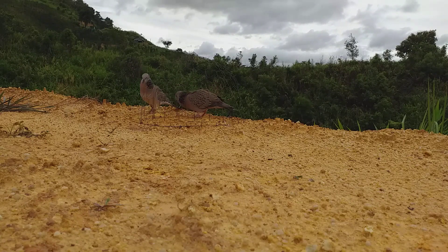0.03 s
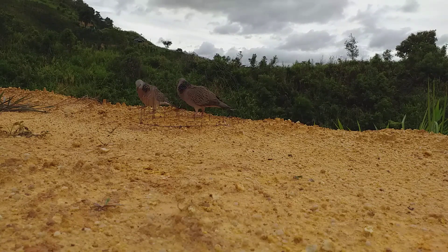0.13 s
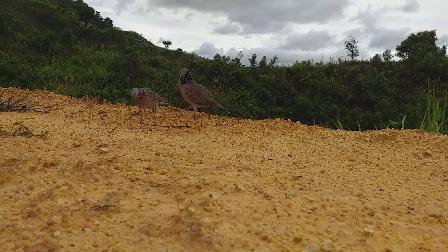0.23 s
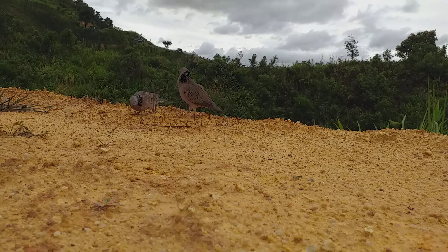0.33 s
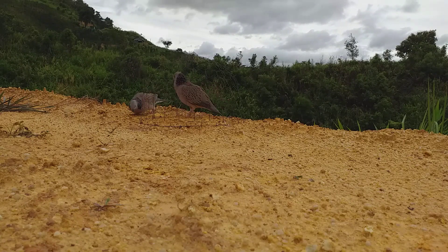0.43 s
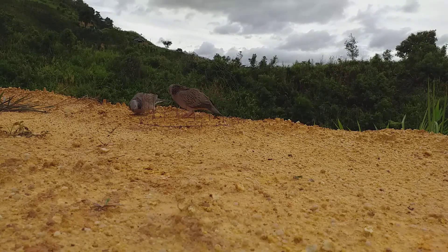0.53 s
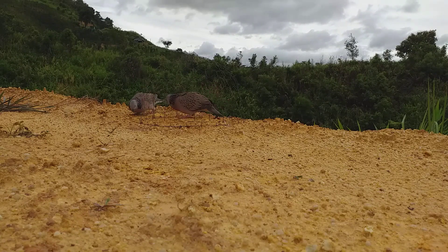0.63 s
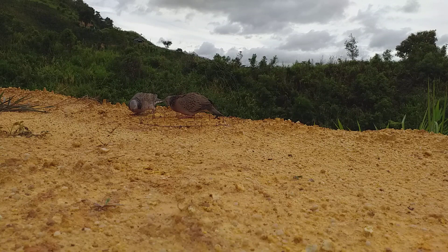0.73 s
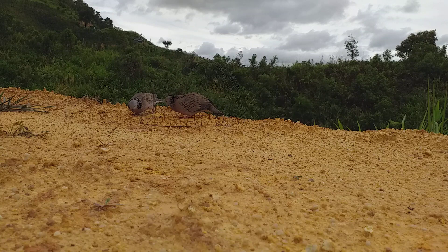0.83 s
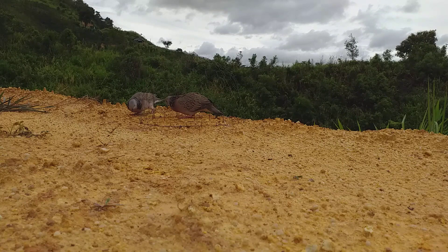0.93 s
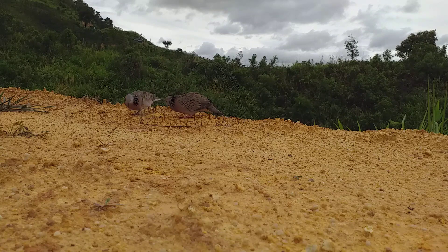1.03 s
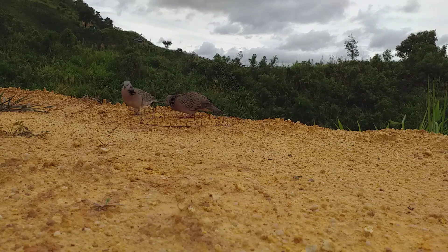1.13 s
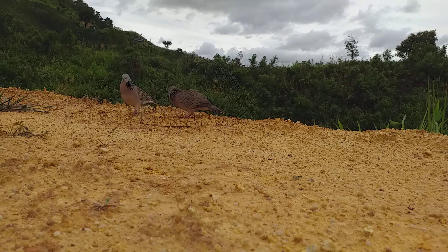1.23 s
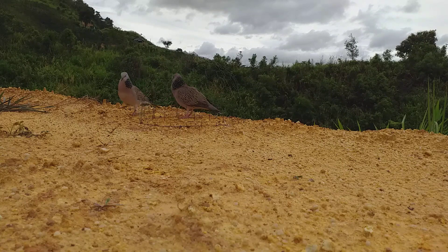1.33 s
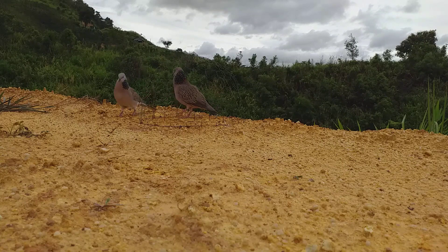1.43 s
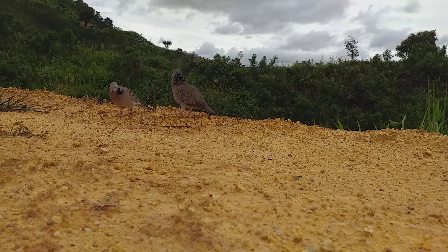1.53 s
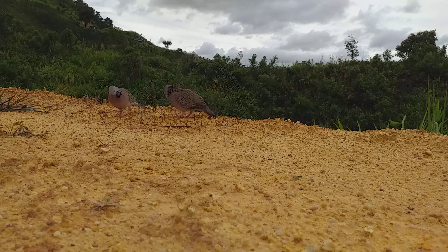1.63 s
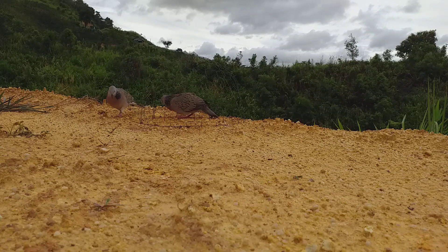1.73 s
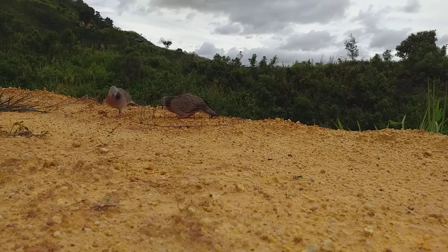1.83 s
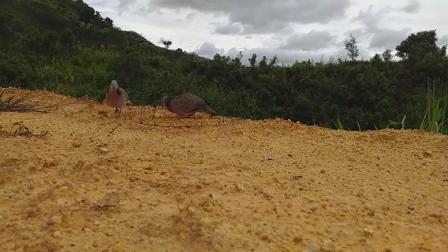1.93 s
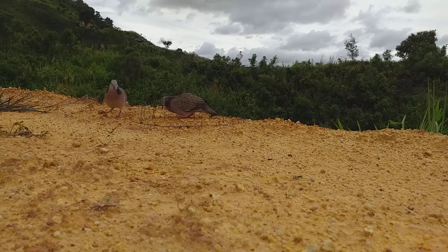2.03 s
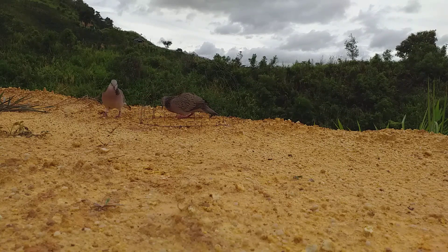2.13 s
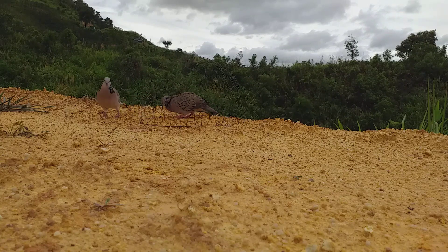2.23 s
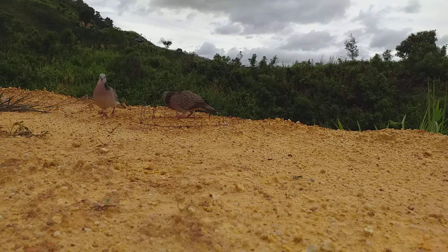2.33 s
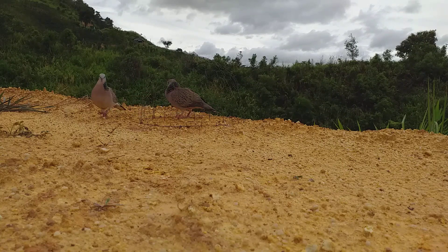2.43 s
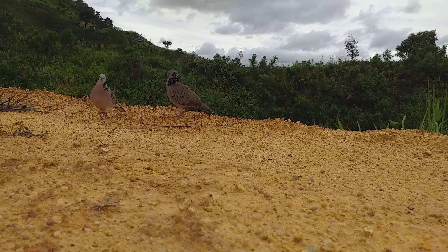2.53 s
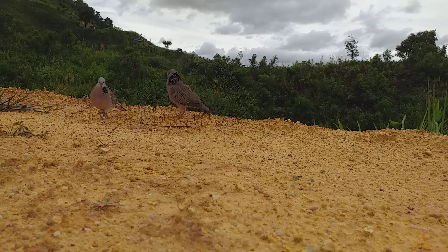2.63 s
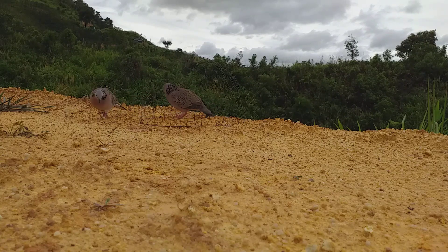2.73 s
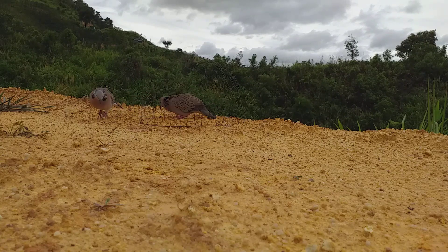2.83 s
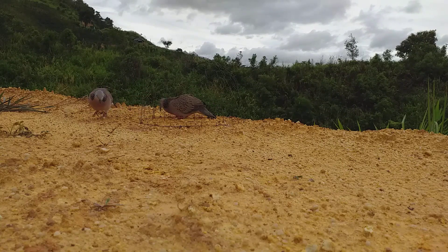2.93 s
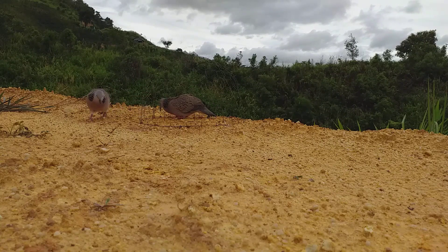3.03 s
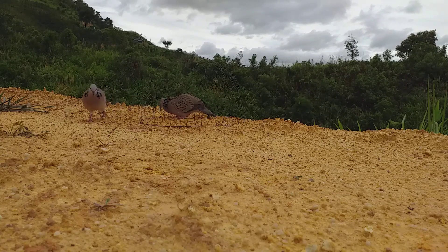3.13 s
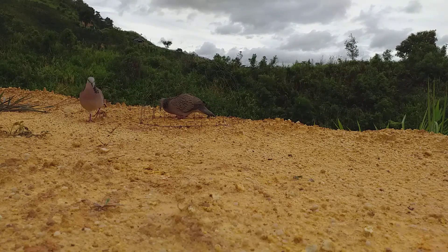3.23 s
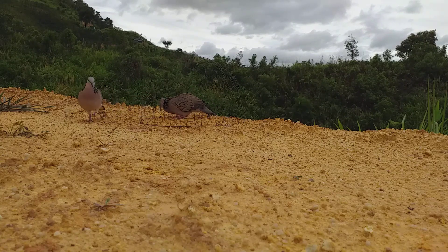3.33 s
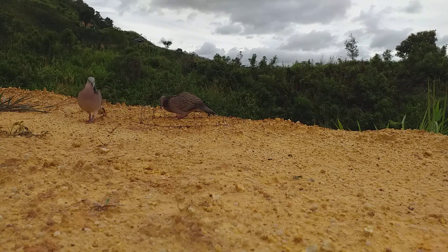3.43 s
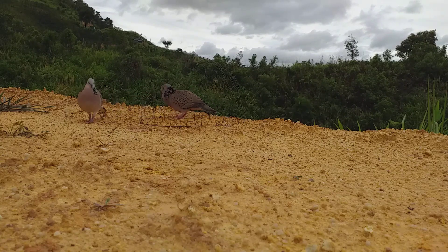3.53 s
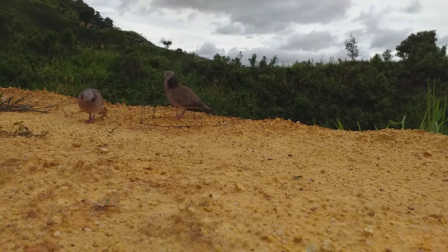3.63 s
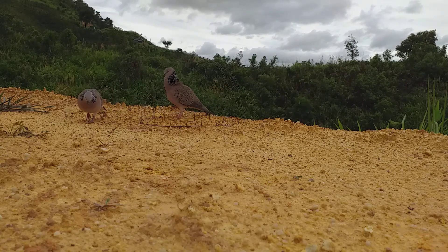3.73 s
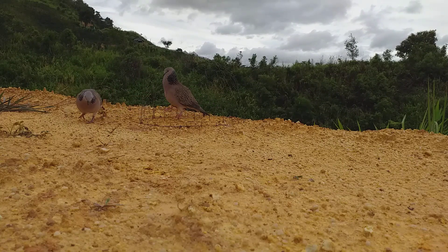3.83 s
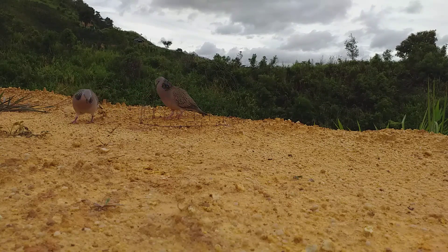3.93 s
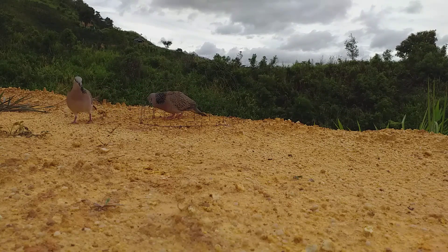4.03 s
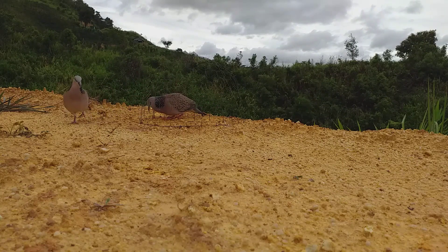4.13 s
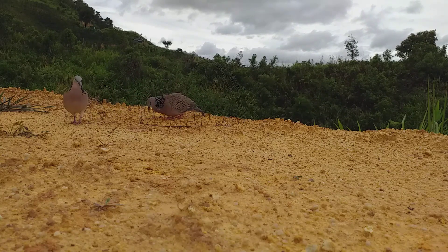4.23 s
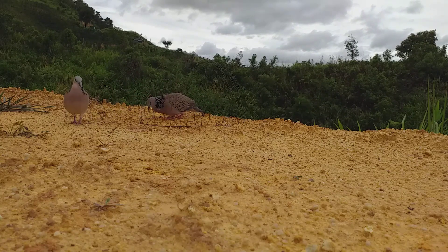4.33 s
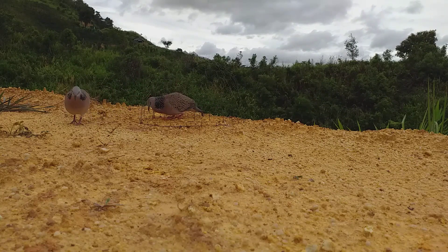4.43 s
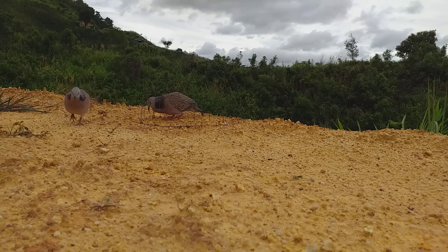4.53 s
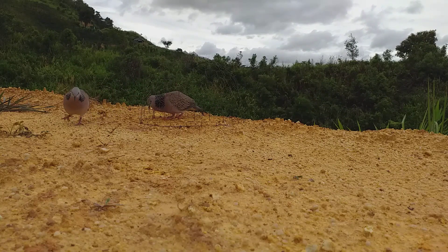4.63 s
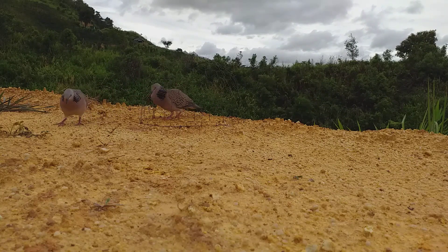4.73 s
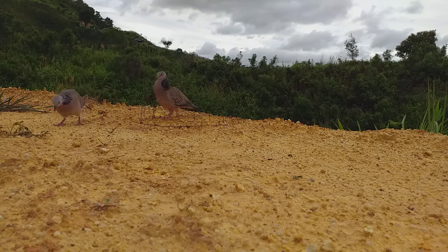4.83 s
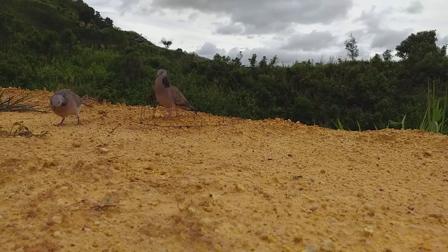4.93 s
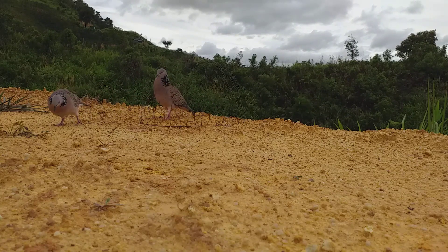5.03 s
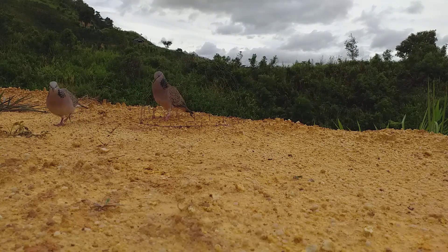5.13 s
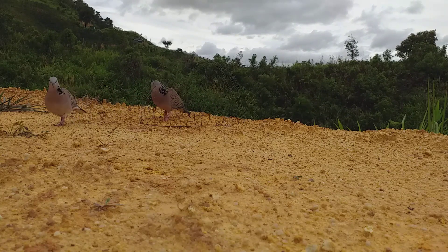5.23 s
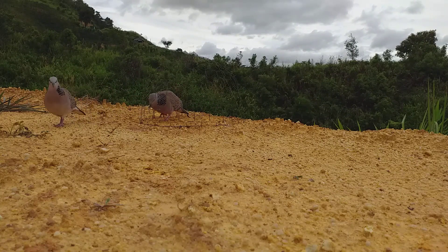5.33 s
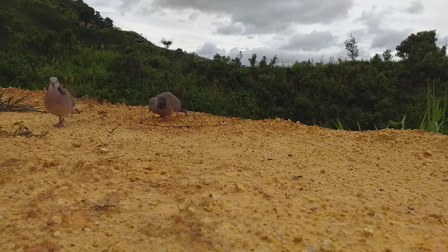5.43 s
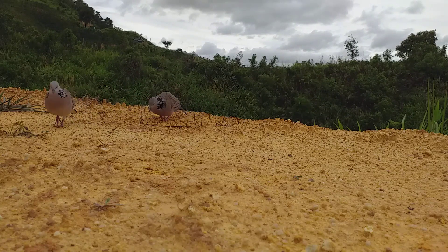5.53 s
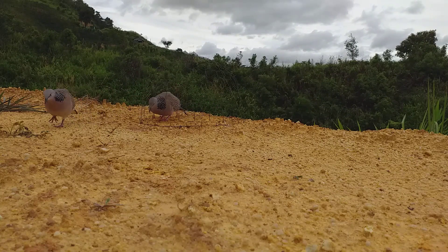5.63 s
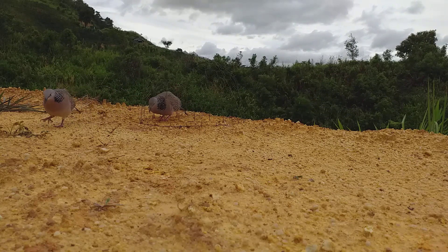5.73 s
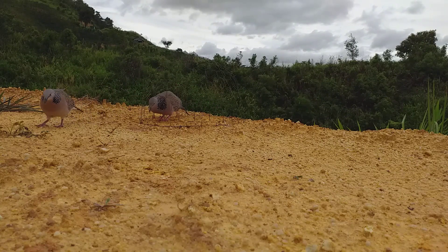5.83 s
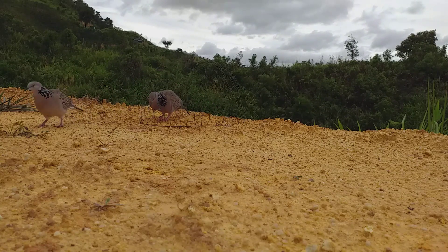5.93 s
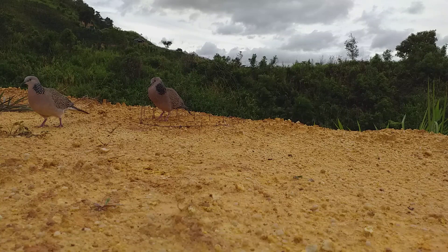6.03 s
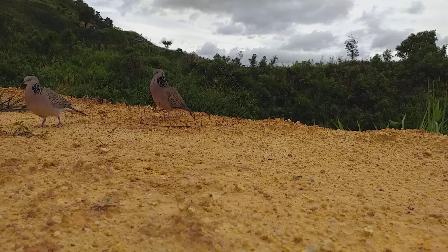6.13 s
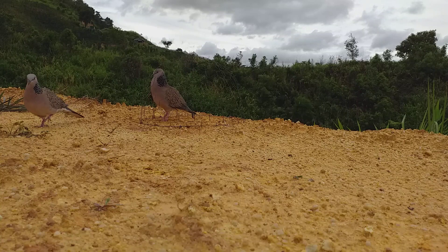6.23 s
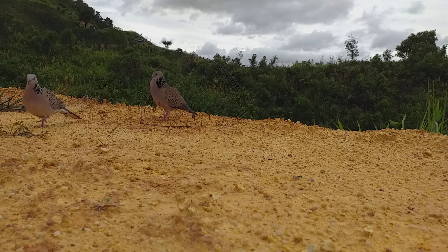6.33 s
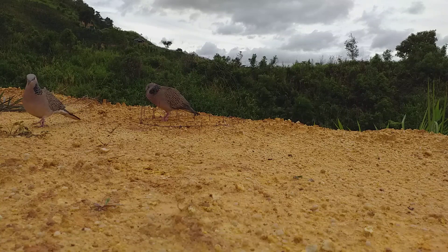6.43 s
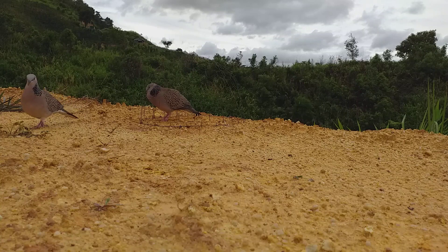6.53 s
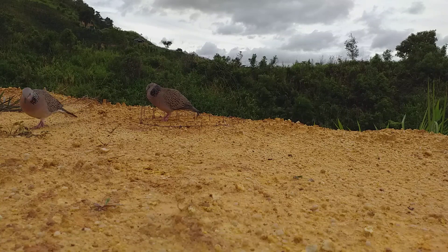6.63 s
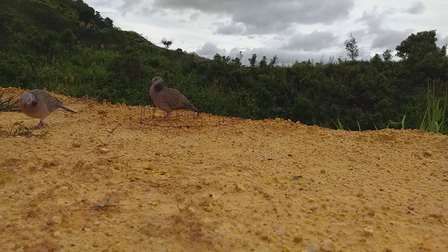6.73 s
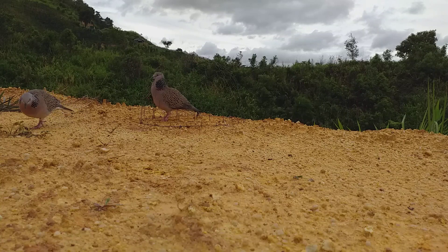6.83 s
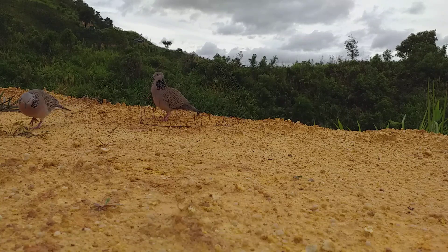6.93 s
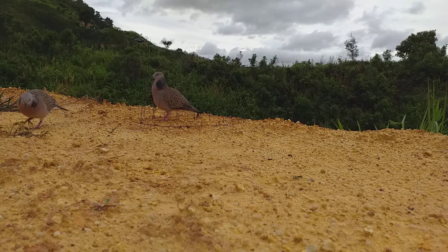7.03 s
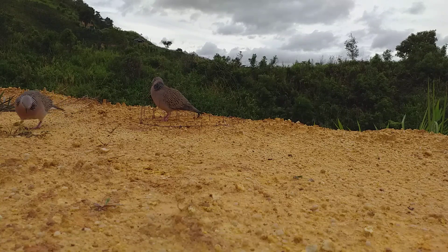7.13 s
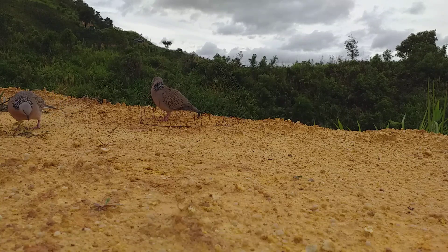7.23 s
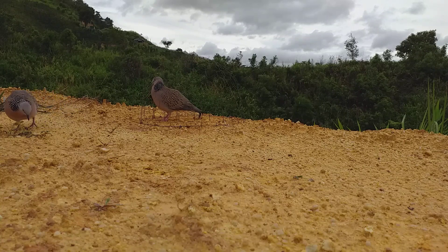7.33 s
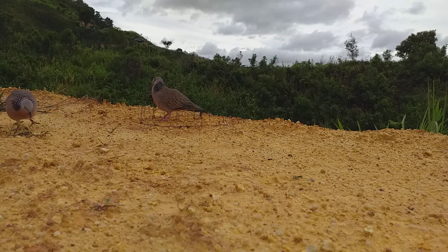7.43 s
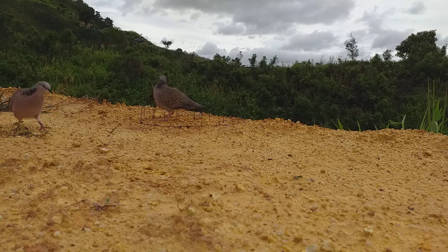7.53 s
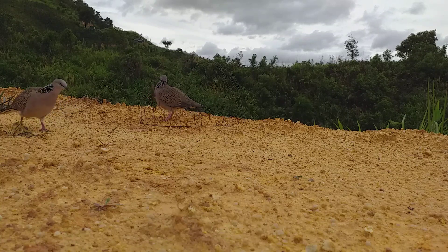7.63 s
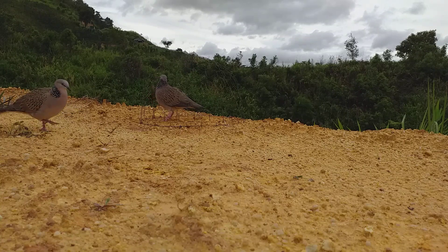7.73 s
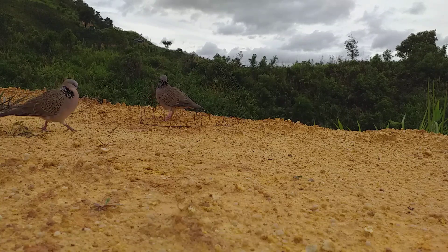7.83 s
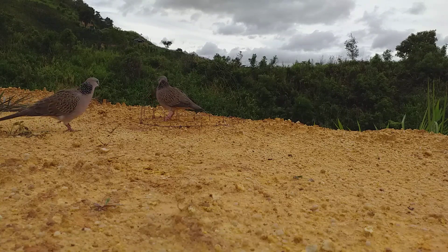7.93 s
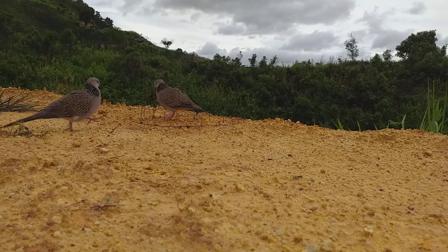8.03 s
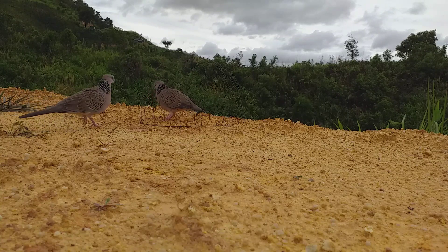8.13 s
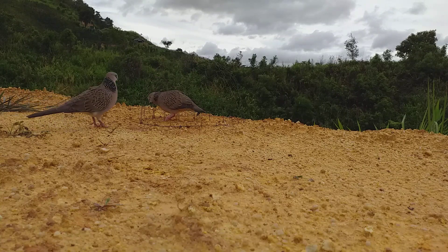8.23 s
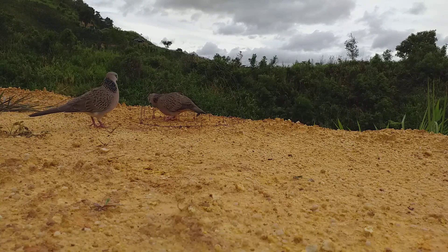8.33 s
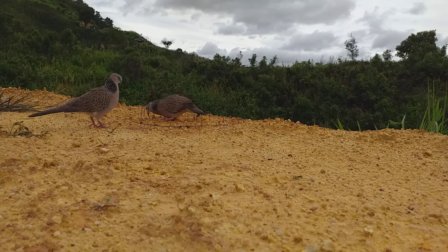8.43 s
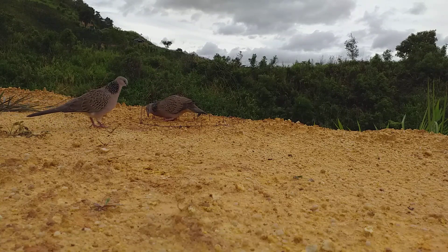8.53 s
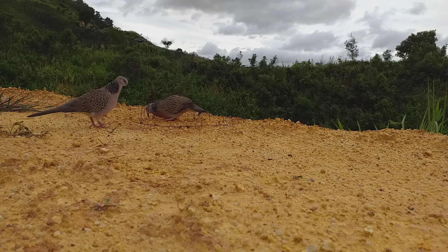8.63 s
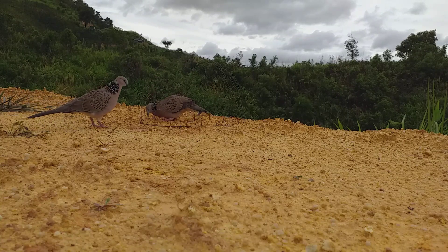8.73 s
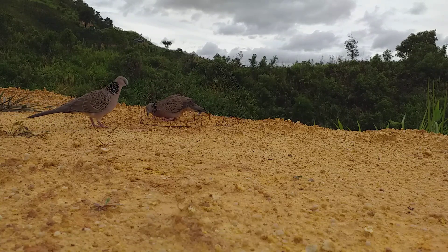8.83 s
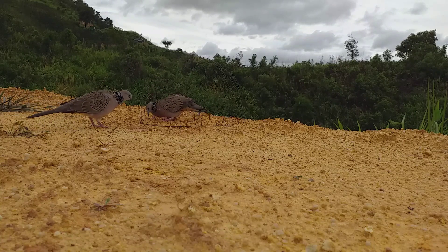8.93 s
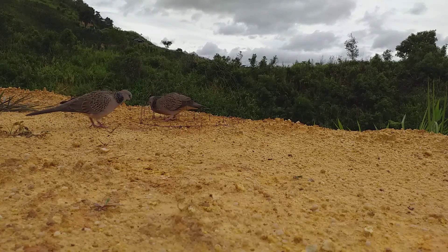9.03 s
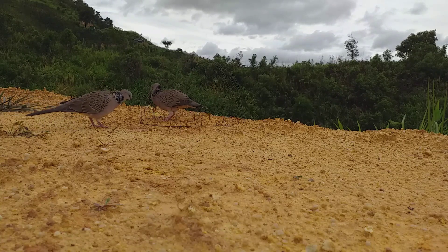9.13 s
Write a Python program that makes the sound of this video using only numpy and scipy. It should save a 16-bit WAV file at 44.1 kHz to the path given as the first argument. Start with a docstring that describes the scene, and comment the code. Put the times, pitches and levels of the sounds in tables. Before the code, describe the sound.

Close, dry dove coos dominate: a brief purring note, then a longer one that flutters, clears to a smooth hoot and sinks away. A higher dove overlaps once near the start. Pairs repeat just over a second apart, stop after six seconds, and return near the end. Very faint crickets, small-bird pips and low air rumble sit behind in open scrub.

```python
"""Spotted doves: paired coos, a short fluttering note and a long one that clears and falls away; a higher voice joins once.
Each coo is a nearly pure tone chopped by a closing valve, shaped by the throat, with overtones and breath added.
Around them: faint far calls (short grainy noise bands), far songbirds (gliding whistles), crickets (paired wing
strokes), a steady air rumble and insect blur (coloured noise), and a faint diffuse echo from the scrub."""
import sys
import numpy as np
from scipy import signal
from scipy.fft import rfft, irfft, next_fast_len
from scipy.io import wavfile
from scipy.ndimage import uniform_filter1d, map_coordinates

SR = 44100
rng = np.random.default_rng(int(sys.argv[2]) if len(sys.argv) > 2 else 0)


def bounce(signal):
    """Save signal as a 16-bit WAV file at the path given by the first command-line argument."""
    frames = np.transpose(np.atleast_2d(signal))
    limited = np.clip(frames, -1, 1)
    pcm = np.round(limited * 32767).astype(np.int16)
    wavfile.write(sys.argv[1], SR, pcm)


N = 404397

# Short coos: (start [s], length [s], drive level [dB], swell [dB/s], mid pitch [Hz], glide [Hz/s],
# flutter [pulses/s], air hiss [dB re drive], throat tuning [1 = lower dove])
SHORT_COOS = [ (0.359, 0.2004, -28, 15.5, 643.9, 198.5, 96, -51, 1.263),
              (0.625, .194, -23.5, 9.5, 600.2, 100.5, 104, -57, 1.003),
              (1.711, 0.1799, -24, 1.5, 594.1, -100, 96, -53.5, 1.0045),
              (2.839, 0.1811, -25, -8.5, 591.6, -100, 106, -49.5, 0.999),
              (4.058, .192, -24.5, 0.5, 576.6, -150, 98, -54, 1),
              (5.329, 0.19, -23.5, -12, 578.9, -200, 98, -47.5, 1),
              (8.437, 0.2198, -28, -35.5, 549.5, -400, 94, -52.5, 1.054)]
# Long coos: (start [s], held drive level [dB], swell [dB/s], held pitch [Hz], mid-flutter rate [pulses/s],
# flutter clears after [s], air hiss [dB re drive], third harmonic [dB])
LONG_COOS = [ (-.205, -19.5, 4.5, 603.1, 70, .28, -50, -31), (.926, -22, -3.5, 601.1, 88, .29, -47, -31),
             (2.004, -21.5, 4, 602.4, 86, .275, -49, -32), (3.136, -21.5, 8.5, 599.5, 82, .27, -49, -32),
             (4.358, -21.5, 3, 584.4, 78, .255, -42.5, -35.5),
             (5.618, -21.5, -9, 590.5, 58, .25, -42.5, -43.5),
             (8.776, -21.5, 10, 607.3, 62, .266, -45.5, -30.5)]
# Higher dove's long note: (time [s], drive level [dB], pitch [Hz])
HIGH_NOTE = [(.65, -46, 639.5), (.698, -29.5, 680), (.778, -30, 700), (.85, -28, 740), (.94, -28.5, 755),
             (.99, -27, 727.8), (1.035, -34, 649.2), (1.06, -56.5, 595)]
# Its flutter: (clears at [s], start, middle, end rate [pulses/s], unevenness [0-1], limp [share of a pulse],
# depth [1 = full closure], air hiss [dB re drive], throat tuning [1 = lower dove])
HIGH_FLUTTER = (0.8543, 94, 80, 42, 0.1118, 0, 1.11, -42.5, 1.4556)
# Swollen-throat response at tuning 1: (frequency [Hz], gain [dB])
THROAT = [(100, -32.5), (250, -5.5), (350, -4.5), (450, -1.5), (560, 5.5), (680, 5), (800, 5), (950, -3.5),
          (1200, -31), (1700, -38), (3000, -67.5)]
# Closed-beak response above the tone, at tuning 1: (frequency [Hz], gain [dB])
OVERTONES = [(300, -23.5), (650, -7.5), (900, 7), (1100, -0.5), (1230, -16), (1400, -21), (1600, -14),
             (1900, -14), (2100, -23.5), (3000, -44)]
# Membrane turbulence spectrum: (frequency [Hz], relative density [dB/Hz])
RASP = [(200, -10.5), (600, 2), (1100, -3), (1900, -5), (3000, -16)]
# Breath spectrum: (frequency [Hz], relative density [dB/Hz])
AIR_HISS = [(50, -8.5), (130, 11), (280, 12.5), (600, -5), (1200, -5), (1700, -9.5), (2400, -6), (3500, 0),
            (4800, 0), (6200, -5), (7400, -12.5), (8500, -24), (15000, -17.5)]
# Air whistling in the higher dove's beak: (time [s], level [dB], pitch [Hz])
BEAK_WHISTLE = [(.4, -100, 7500), (.52, -74, 7500), (.58, -93.5, 7500), (.68, -85.5, 7700),
                (.75, -72, 7350), (0.849, -68, 7220), (0.931, -71, 6930), (1.02, -82.5, 6230),
                (1.079, -105, 6240)]
# Faint distant calls, hazy and noisy: (centre time [s], half length [s], centre frequency [Hz],
# level before window [dB])
FAR_CALLS = [(1.59, .05, 1700, -78), (2.58, .05, 1800, -79), (2.7, .07, 4000, -68), (6.9, .08, 1750, -77),
             (7.88, .08, 1850, -75.5), (8.08, .07, 1800, -75.5)]
# Small bird's runs of falling pips: (first pip centre [s], level [dB])
PIP_RUNS = [(-.015, -58.5), (0.384, -59.5), (0.781, -58), (1.231, -59)]
# Far songbird notes: (start [s], length [s], start, middle, end pitch [Hz], level [dB])
TWEETS = [(2.94, 0.064, 2984, 3230, 3080, -66), (2.982, 0.0582, 3385, 3130, 3090, -62.5),
          (3.587, 0.0436, 4300, 4000, 3690, -70.5), (3.675, 0.037, 3050, 3300, 3690, -71),
          (3.742, 0.0454, 3940, 3700, 3480, -72.5), (3.855, 0.0586, 3262, 3550, 3080, -70),
          (3.92, 0.044, 4150, 4250, 3500, -67), (3.99, 0.059, 3480, 3700, 2980, -68.5),
          (4.028, .034, 3190, 3550, 4000, -65), (4.09, .03, 4100, 3750, 3346, -69)]
# Crickets: (first chirp [s], period [s], mid pitch [Hz], relative level [dB])
CRICKETS = [(.131, .2953, 5570, -64.5), (.21, .3018, 5500, -65.5), (.137, .2875, 5870, -69.5),
            (.207, .312, 5780, -72), (.148, .288, 6090, -80)]
# Outdoor air spectrum: (frequency [Hz], relative density [dB/Hz])
AIR = [(20, -32), (35, -21), (52, -6), (80, -2), (100, 0), (190, -5), (300, -13), (450, -16), (700, -21),
       (1500, -27), (3300, -27), (5000, -28), (7500, -31.5), (8600, -35), (15700, -30)]
# Far insect blur: (frequency [Hz], relative density [dB/Hz])
CHORUS = [(3000, -31.0), (4400, -18.5), (5000, -9.5), (5300, -15.0), (5500, -1), (5900, -6.5),
          (6250, -23.0), (7500, -20.5), (8300, -48)]
# Scrub echo decay: (frequency [Hz], t60 [s])
SCRUB = [(300, .3), (700, .28), (3000, .33), (6000, .3), (12000, .15)]

# coo contours
ONSET_DB, SHORT_ATTACK_S, LONG_ATTACK_S = 27.5, .0105, .014
SCOOP_SHARE, SCOOP_S = 0.19, .022  # slide up to pitch
RELEASE_DB, RELEASE_S = 24, .014  # end of a short coo
DROOP_SHARE, DROOP_S = .17, .028  # its final pitch droop
LONG_COO_S, HOLD_S = .403, 0.24815
ROUNDING_S = .017  # bend from hold into fall
SINK_HZ_PER_S, FALL_DB_PER_S = 1080, 111
EDGE_S = .012  # fade at both ends of a note
# flutter
FIRST_PULSES_PER_S, LAST_PULSES_PER_S = 96, 43  # long coo
SHORT_UNEVEN, LONG_UNEVEN = .07, .22  # 0-1
LIMP = .06  # long coo: every second pulse shorter and weaker [share of a pulse]
DEPTH = .96  # lower dove's valve closure, 1 = full
SLIP_RAD = 1.3  # phase scatter from pulse to pulse
BEND = .6  # pitch swing within a pulse, per unit of unevenness
# voice
JITTER, SHIMMER = .016, .08  # quick unsteadiness of pitch, loudness [shares]
WIDEST_SWING = .15  # soft limit of membrane amplitude
SHORT_THIRD_DB = -39
HIGH_SECOND_DB, HIGH_THIRD_DB = -31, -40
DULL_START_DB, BRIGHTEN_S = 8.5, 0.016  # overtones lag the tone
HOARSENING = 0.58  # breath gained per effort lost [dB/dB]
# surroundings
CRICKET_STROKE_S, CRICKET_RASP_RAD = .056, .55
AIR_DB = -66.6
FADE_IN_S, TOP_HZ = .004, 15750


def amp(db):
    """Decibels to gain."""
    return 10 ** (np.asarray(db) / 20)


def unit(x):
    """Scale to rms 1."""
    return x / np.sqrt(np.mean(x ** 2) + 1e-20)


def along(points, hz):
    """Read (Hz, value) points on a log-frequency axis."""
    f, v = np.transpose(points)
    return np.interp(np.log(hz + 1), np.log(f + 1), v)


def filtered(x, response):
    """Multiply the spectrum of x by response(hz)."""
    m = next_fast_len(len(x) + 8192)
    return irfft(rfft(x, m) * response(np.fft.rfftfreq(m, 1 / SR)), m)[:len(x)]


def noise(spectrum, size):
    """Coloured noise of rms 1."""
    white = rng.standard_normal(size)
    return unit(filtered(white, lambda hz: amp(along(spectrum, hz))))


def wobble(knots_per_s, size):
    """Smooth random curve through normal knots."""
    knots = rng.standard_normal(int(size * knots_per_s / SR) + 4)
    return map_coordinates(knots, [np.arange(size) * knots_per_s / SR])


def turn(hz):
    """Running phase [rad] of a frequency curve."""
    return 2 * np.pi * np.cumsum(hz) / SR


def add(track, start_s, sound):
    """Mix a sound into the track, clipped to its ends."""
    at = round(start_s * SR) + np.arange(len(sound))
    inside = (at >= 0) & (at < N)
    track[at[inside]] += sound[inside]


def doves():
    """All coos, plus the higher dove's long note."""
    out = np.zeros(N)
    for row in SHORT_COOS:
        add(out, row[0], short_coo(*row))
    for row in LONG_COOS:
        add(out, row[0], long_coo(*row))
    add(out, HIGH_NOTE[0][0], coo(HIGH_NOTE, HIGH_FLUTTER, HIGH_THIRD_DB, HIGH_SECOND_DB))
    return out


def short_coo(start_s, length_s, db, swell, hz, glide, rate, hiss_db, tuning):
    """An arch of level and pitch that flutters at a steady mean rate to its end."""
    u = np.linspace(0, length_s, num=200)
    from_middle = u - length_s / 2
    level_db, pitch_hz = onset(u, SHORT_ATTACK_S, db + swell * from_middle, hz + glide * from_middle)
    level_db = level_db - RELEASE_DB * np.exp((u - length_s) / RELEASE_S)
    pitch_hz = pitch_hz * (1 - DROOP_SHARE * np.exp((u - length_s) / DROOP_S))
    flutter = (start_s + length_s, rate, rate, SHORT_UNEVEN, 0, DEPTH, hiss_db, tuning)
    return coo(np.column_stack([start_s + u, level_db, pitch_hz]), flutter, SHORT_THIRD_DB)


def long_coo(start_s, db, swell, hz, rate, clears_s, hiss_db, third_db):
    """Holds while the flutter slows; as air runs out, level and pitch sink together in a clear tone."""
    u = np.linspace(0, LONG_COO_S, num=400)
    # seconds into the fall, with a rounded corner
    spent_s = ROUNDING_S * np.logaddexp(0, (u - HOLD_S) / ROUNDING_S)
    held_db = db + swell * np.minimum(u - HOLD_S, 0)
    falling_db = held_db - FALL_DB_PER_S * spent_s
    sinking_hz = hz - SINK_HZ_PER_S * spent_s
    level_db, pitch_hz = onset(u, LONG_ATTACK_S, falling_db, sinking_hz)
    rates = (FIRST_PULSES_PER_S, rate, LAST_PULSES_PER_S)
    flutter = (start_s + clears_s, *rates, LONG_UNEVEN, LIMP, DEPTH, hiss_db, 1)
    return coo(np.column_stack([start_s + u, level_db, pitch_hz]), flutter, third_db)


def onset(u, attack_s, db, hz):
    """Level and pitch rise as air pressure builds, u seconds in."""
    return db - ONSET_DB * np.exp(-u / attack_s), hz * (1 - SCOOP_SHARE * np.exp(-u / SCOOP_S))


def coo(note, flutter, third_db, second_db=-33, side_hz=135, side_db=-19, clear_third_db=7, rasp_db=-31):
    """A nearly pure tone chopped by valve flutter, through throat and closed beak, with breath hiss."""
    s, level_db, pitch_hz = np.transpose(note)
    clears_s, *rates, uneven, limp, depth, hiss_db, tuning = flutter
    t = np.arange(s[0], s[-1], 1 / SR)
    size = len(t)

    def shaped(x, points):
        return filtered(x, lambda hz: amp(along(points, hz / tuning)))

    effort = amp(np.interp(t, s, level_db))
    to_edge_s = np.minimum(t - t[0], t[-1] - t)
    fade = np.sin(np.pi / 2 * np.clip(to_edge_s / EDGE_S, 0, 1)) ** 2

    # closures grow shallow around the clearing time
    fluttering = np.exp(-np.maximum(t - clears_s + .02, 0) / .024)
    clear = 1 - fluttering
    swell, position, slip = flutter_pulses(t, clears_s, rates, uneven, limp, depth)
    swell = 1 + fluttering * (swell - 1)

    # pitch climbs within each pulse
    climb = fluttering * BEND * uneven * ((swell - 1) / 2 + 2 * (position - .5))
    waver = JITTER * (1 - clear / 2) * wobble(220, size)
    phase = slip + turn(np.interp(t, s, pitch_hz) * (1 + climb + waver))

    # once clear, a weak second tone beats above the first and the fading voice grows hoarser
    hoarse = 1 + clear * ((effort.max() / effort) ** HOARSENING - 1)
    side = amp(side_db) * clear * np.sin(phase + turn(side_hz * (1 + 0.34 * wobble(90, size))))

    drive = effort * fade * swell * (1 + SHIMMER * wobble(300, size))
    drive = drive / (1 + (drive / WIDEST_SWING) ** 8) ** (1 / 8)
    tone = shaped(drive * (np.sin(phase) + hoarse * side), THROAT)

    second = amp(second_db) * np.sin(2 * phase)
    third = amp(third_db + clear * clear_third_db) * np.sin(3 * phase)
    rasp = amp(rasp_db) * noise(RASP, size)
    bright = amp(-DULL_START_DB * np.exp((t[0] - t) / BRIGHTEN_S))
    overtones = shaped(drive * hoarse * bright * (second + third + rasp), OVERTONES)
    hiss = drive * hoarse * amp(hiss_db) * noise(AIR_HISS, size)
    return tone + overtones + hiss


def flutter_pulses(t, clears_s, rates, uneven, limp, depth, scatter_db=9):
    """Valve snapping shut at an uneven rate: gives loudness, position within the pulse, phase slip."""
    closure_s = .004
    mean_rate = np.interp(t, np.linspace(t[0], clears_s, len(rates)), rates)
    rate = mean_rate * np.exp(uneven * wobble(60, len(t)))
    beat = np.cumsum(rate) / SR
    beat = beat + limp * np.cos(np.pi * beat)
    pulse = beat.astype(int)
    strength, kick = rng.standard_normal((120, 2))[pulse].T
    # closure time is the same at any rate, so slow pulses have flat tops
    opening = np.tanh(np.abs(np.sin(np.pi * beat)) / (np.pi * rate * closure_s)) ** 1.3
    opening = opening * (1 - 2 * limp * (pulse % 2))
    scatter = amp(scatter_db * uneven * np.minimum(strength, .5))
    swell = unit(1 - depth * (1 - opening * scatter))
    # membrane restarts out of step after each closure
    slip = np.cumsum(np.diff(pulse, prepend=0) * kick * SLIP_RAD * (t < clears_s))
    return swell, uniform_filter1d(beat % 1, size=60), uniform_filter1d(slip, size=60)


def beak_whistle(blur_rad=1.3):
    """Air whistling in the higher dove's beak: a phase-blurred sine that sinks as the note runs out."""
    s, db, hz = np.transpose(BEAK_WHISTLE)
    t = np.arange(s[0], s[-1], 1 / SR)
    phase = turn(np.interp(t, s, hz)) + blur_rad * wobble(900, len(t))
    out = np.zeros(N)
    add(out, s[0], amp(np.interp(t, s, db)) * np.sqrt(2) * np.sin(phase))
    return out


def far_calls():
    """Faint distant calls, hazy and noisy: short noise bands with a grainy random level."""
    out = np.zeros(N)
    for centre_s, half_s, hz, db in FAR_CALLS:
        size = int(2 * half_s * SR)
        colour = [(hz / 2, -25), (hz / 1.2, 0), (hz * 1.2, -2), (hz * 2, -22)]
        grain = amp(2.8 * wobble(200, size))
        add(out, centre_s - half_s, amp(db) * np.hanning(size) ** 2 * noise(colour, size) * grain)
    return out


def songbird_whistle(length_s, pitches_hz, db):
    """Thin whistle on a parabolic glide through three pitches."""
    u = np.linspace(0, 1, int(length_s * SR))
    glide_hz = np.polyval(np.polyfit([0, .5, 1], pitches_hz, 2), u)
    phase = turn(glide_hz) + 0.68 * wobble(450, len(u))
    return amp(db) * np.sqrt(2) * np.sin(np.pi * u) ** 0.42 * np.sin(phase)


def songbirds(pip_gap_s=.0258, pip_s=0.015, from_hz=4130, to_hz=3840, first_pip_db=-8, count=5):
    """Far small birds: runs of falling pips, the first weaker, and single gliding notes."""
    out = np.zeros(N)
    pip_hz = [from_hz, (from_hz + to_hz) / 2, to_hz]
    for s, db in PIP_RUNS:
        for k in range(count):
            pip = songbird_whistle(pip_s, pip_hz, db + first_pip_db * (k == 0))
            add(out, s + k * pip_gap_s - pip_s / 2, pip)
    for s, length_s, *pitches_hz, db in TWEETS:
        add(out, s, songbird_whistle(length_s, pitches_hz, db))
    return out


def crickets(level_db=-0.14):
    """Double chirps, each cricket on its own beat; a wing stroke is a rough tone falling in pitch."""
    pair_gap_s, fall_hz = .069, 260
    out = np.zeros(N)
    u = np.linspace(0, 1, int(CRICKET_STROKE_S * SR))
    envelope = np.sin(np.pi * u) ** 2 * np.sqrt(2)
    for first_s, period_s, hz, db in CRICKETS:
        for s in np.arange(first_s - period_s, N / SR, period_s):
            for stroke_s in (s, s + pair_gap_s):
                phase = turn(hz + fall_hz * (.5 - u)) + CRICKET_RASP_RAD * wobble(270, len(u))
                gain = amp(level_db + db + rng.normal(0, 2.6))
                add(out, stroke_s - CRICKET_STROKE_S / 2, gain * envelope * np.sin(phase))
    return out


def air(chorus_db=-75):
    """Steady outdoor rumble and hiss, plus the blur of many far insects, as coloured noise."""
    return amp(AIR_DB) * noise(AIR, N) + amp(chorus_db) * noise(CHORUS, N)


def scrub(x, delay_s=0.033):
    """Diffuse echo: a delayed noise tail, each frequency decaying at its own speed."""
    hz, t, z = signal.stft(rng.standard_normal(SR // 2), SR, nperseg=256)
    decay = amp(-60 * t / along(SCRUB, hz)[:, None])
    tail = signal.istft(z * decay, SR, nperseg=256)[1]
    delayed = np.pad(x, (int(delay_s * SR), 0))
    return signal.fftconvolve(delayed, tail / np.linalg.norm(tail))[:N]


def scene():
    """Doves and hazy calls with little echo; songbirds and insects with more."""
    doves_and_calls = doves() + beak_whistle() + far_calls()
    birds, insects = songbirds(), crickets()
    echo = scrub(amp(-30.5) * doves_and_calls + amp(-9) * birds + amp(-4.0) * insects)
    return (doves_and_calls + birds + insects + echo + air())[None]


def record(dry):
    """Fade in, then remove everything from TOP_HZ up."""
    fade_in = np.sin(np.pi / 2 * np.minimum(np.arange(N) / SR / FADE_IN_S, 1)) ** 2
    return np.array([filtered(channel * fade_in, lambda hz: hz < TOP_HZ) for channel in dry])


dry = scene()
out = record(dry)
bounce(out)
```